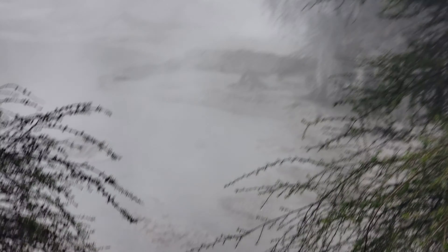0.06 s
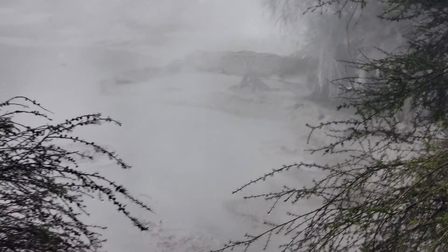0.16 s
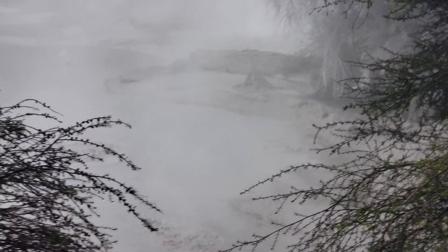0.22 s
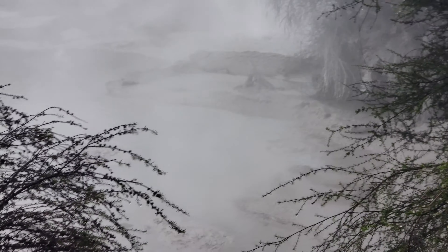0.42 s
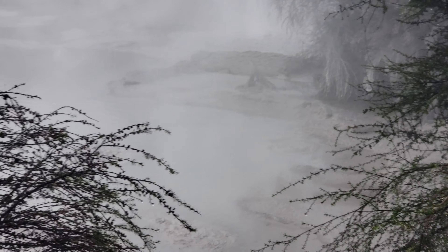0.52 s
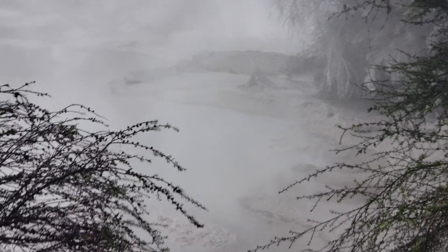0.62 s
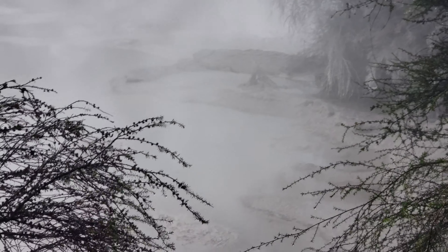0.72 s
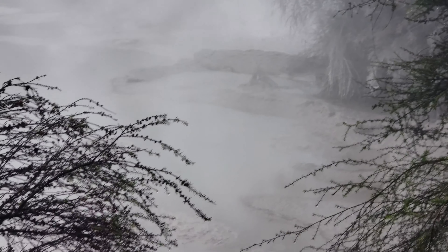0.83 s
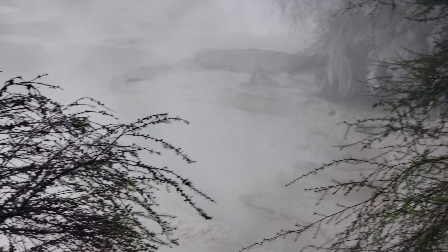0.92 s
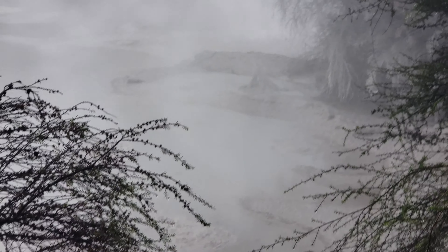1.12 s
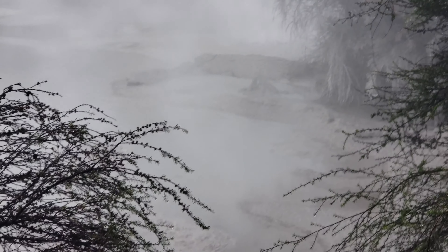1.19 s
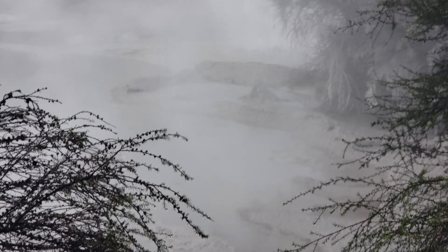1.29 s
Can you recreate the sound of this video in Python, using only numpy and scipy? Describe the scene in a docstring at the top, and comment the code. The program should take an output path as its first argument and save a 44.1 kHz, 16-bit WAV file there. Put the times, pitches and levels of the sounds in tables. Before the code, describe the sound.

Thick mud bubbles quietly in an outdoor hot pool, with irregular glugs and small wet pops over a low churn and faint steam hiss. Early on, a hand knocks once on the camera, then ticks and brushes lightly against it.

```python
"""A pool of hot mud simmers outdoors: gas pockets resonate in glugs, mostly rising in pitch, thin skins snap
open and spatter lands, and brief gusts of wind rumble low. Close by, a hand knocks once on a camera body,
exciting its damped modes, then ticks and brushes against it. Behind lie the soft hiss of steam, small ringing
bubbles, the low churn of distant boiling and dull echoes from the banks."""
import sys
import numpy as np
from scipy import signal
from scipy.io import wavfile

SR = 44100
rng = np.random.default_rng(int(sys.argv[2]) if len(sys.argv) > 2 else 0)


def unload_audio(sound):
    """Save the sound as a 16-bit wav file, at the path given as the first command line argument."""
    columns = np.transpose(np.atleast_2d(sound))
    # keep every value between -1 and 1, then stretch to whole-number steps
    steps = np.round(np.clip(columns, -1, 1) * 32767)
    wavfile.write(sys.argv[1], SR, steps.astype(np.int16))


N = 59535
TIME = np.arange(N) / SR
CUTOFF_HZ = 16200
POOL_PAN_DB, POOL_LAG_S, CASE_LAG_S = 4.5, 0.00029, 0.000342   # pan: left minus right; lag: right is later

# gas pockets, and low gusts of wind (the rows below 80 Hz): (time [s], length [s], start pitch [Hz], end pitch
# [Hz], level [dB], roughness [0-1])
GLUGS_AND_GUSTS = [(.004, 0.017, 480, 546, -52, 0.44), (.040, 0.022, 138, 170, -50.5, 0.5),
                   (0.099, 0.034, 206, 242, -60.5, 0.6), (0.121, 0.075, 99, 84, -50, 0),
                   (0.126, 0.032, 205, 250, -50.5, 0.48), (0.176, 0.017, 762, 660, -50, 0.5),
                   (.188, 0.038, 216, 292, -54.5, 0.8), (0.223, 0.015, 576, 710, -43.5, 0.6),
                   (0.297, 0.055, 277, 307, -51.5, 0.54), (0.425, 0.035, 87, 101, -54, 0.6),
                   (0.521, 0.024, 261, 370, -46.5, 0.6), (0.537, 0.033, 448, 640, -52.5, 0.4),
                   (0.611, 0.026, 192.5, 319, -41.5, 0.17), (.630, 0.023, 182, 170, -53, 0.1),
                   (.698, 0.079, 127.6, 152, -52.5, 0.3), (0.797, 0.0073, 241, 286, -38.5, 0),
                   (.803, 0.027, 212, 237, -52, 0.2), (.902, 0.059, 118, 193, -52, 0.7),
                   (.948, 0.034, 316, 440, -55.5, 0.65), (0.929, 0.093, 42, 53, -57, 0),
                   (1.071, 0.03, 211, 288, -47.5, 0.25), (1.072, 0.027, 96, 122, -51, 0.5),
                   (1.135, 0.045, 232, 345, -52, 0.66), (1.145, 0.018, 500, 610, -55, 0.7),
                   (1.078, 0.024, 666, 740, -56.5, 0.8), (1.165, 0.017, 226, 390, -41.5, 0.42),
                   (1.186, 0.0082, 675, 800, -45, 0.17), (1.1975, 0.0065, 357, 510, -42, 0.13),
                   (1.175, 0.058, 179, 220, -51, 0.25), (1.2, 0.036, 61.4, 69.6, -56, 0)]
def glugs(rise=0.24, fade_power=1.28, wobble_hz=83):
    """Cavity resonance: each gas pocket swells, rings and glides in pitch as it opens; the lowest rows are
    brief gusts of wind rumbling."""
    out = np.zeros(N)
    for start, length, from_hz, to_hz, db, rough in GLUGS_AND_GUSTS:
        age = np.clip((TIME - start) / length, 0, 1)
        swell = np.minimum(age / rise, np.maximum((1 - age) / (1 - rise), 0) ** fade_power)
        hz = from_hz * (to_hz / from_hz) ** age
        phase = 2 * np.pi * np.cumsum((age > 0) * hz) / SR
        wobble = np.sin(phase) * drift(wobble_hz) + np.cos(phase) * drift(wobble_hz)
        out += from_db(db) * swell * (np.sin(phase) + rough * wobble) / np.sqrt(1 + 2 * rough ** 2)
    return out


# landing mud: (time [s], level [dB], centre [Hz], t60 [s])
MUD_IMPACTS = [(.060, -51.5, 1660, 0.026), (.151, -43.5, 1270, 0.025), (.203, -44, 2500, 0.038),
               (0.212, -41.5, 2520, 0.014), (0.321, -46.5, 790, 0.04), (.356, -45.5, 1300, 0.019),
               (0.369, -46, 1400, 0.018), (0.537, -41.5, 3980, 0.0081), (0.565, -48, 1130, 0.015),
               (0.64, -50, 830, 0.013), (.660, -46.5, 3830, 0.017), (.669, -48, 1460, 0.02),
               (.703, -52, 1200, 0.04), (0.8021, -46.5, 1500, 0.0091), (.834, -45, 1630, 0.0099),
               (1.249, -53, 5000, 0.0065), (0.877, -47, 1050, 0.012), (.967, -56, 1580, 0.053),
               (1.113, -49.5, 1230, 0.019)]
def splats():
    """Impact noise: thrown mud lands in brief broadband bursts."""
    return sum(burst(*row, width=0.45) for row in MUD_IMPACTS)


# bursting skins: (time [s], level [dB], pitch [Hz], t60 [s])
SKIN_RUPTURES = [(.152, -45, 1290, 0.013), (0.369, -48, 1380, 0.0057), (.380, -51, 3300, 0.0047),
                 (.565, -43.5, 1130, 0.0069), (.669, -49, 950, 0.0077), (.836, -48, 1610, 0.0061),
                 (0.8573, -43, 1090, 0.0091), (.858, -51, 2530, 0.018), (0.859, -47.5, 3280, .006),
                 (1.035, -48.5, 1520, 0.005)]
def pops():
    """Impulse excitation: thin mud skins snap open with a short, clean ring."""
    return sum(ping(*row) for row in SKIN_RUPTURES)


# modes of the camera body: (frequency [Hz], relative level [dB], t60 [s], pan [dB])
CASE_MODES = [(361, -24, 0.074, 2), (558, -31, 0.066, 18), (658, -20, 0.03, 22), (977, -37, 0.0318, -6),
              (1310, -26, 0.021, 16), (1610, -7.5, 0.014, -4.5), (2080, -10.5, 0.01, 9),
              (2464, -19.5, 0.021, 1), (2710, -15, 0.011, -5), (3260, -20.5, 0.0068, -14.5),
              (4154, -13, 0.0096, -5.5), (4500, -14.5, 0.005, -4), (5760, -22.5, 0.0059, -8),
              (6520, -21.5, 0.0072, -8.5), (7240, -25.5, 0.0062, -16), (11210, -24.5, 0.0076, -1)]
def knock(start, gain_db=0.07, radiation_hz=2275, contact_hz=6870):
    """Modal vibration: a hard contact starts all modes at once and jolts the camera with a soft thud."""
    modes = sum(place(-ping(start, db + gain_db, hz, t60), pan_db, CASE_LAG_S)
                for hz, db, t60, pan_db in CASE_MODES)
    # the small case radiates little bass; the slightly soft contact limits the treble
    band = signal.butter(1, [radiation_hz, contact_hz], "band", fs=SR, output="sos")
    thud = place(ping(start, db=-44.5, hz=118, t60=0.13), pan_db=10, lag=CASE_LAG_S)
    return signal.sosfilt(band, modes) + thud


# spectrum of loose parts: (frequency [Hz], relative density [dB])
RATTLE_SPECTRUM = [(45, -6), (90, 3), (200, -5), (430, -3), (650, -2), (1200, 2.5), (1600, -3), (2900, 0.5),
                   (4700, -13), (8000, -22), (15500, -30)]
def rattle(start, tail_db=-34.5, shiver_db=-30.5):
    """Damped vibration: jolted loose parts give a quick shiver and a longer tail of noise."""
    def envelope(hz):
        tail_t60 = at_hz([(150, 0.37), (2000, 0.1), (11000, 0.24)], hz)   # (frequency [Hz], t60 [s])
        shiver = from_db(shiver_db) * dying(start, t60=0.031) * (hz > 250)
        return from_db(tail_db) * dying(start, tail_t60) + shiver
    return banded_noise(RATTLE_SPECTRUM, flicker_db=3, envelope=envelope)


# finger contacts: (time [s], level [dB], pitch [Hz], t60 [s], pan [dB])
FINGER_TICKS = [(0.4829, -40, 4330, 0.004, 9), (0.4821, -42, 13700, 0.0018, -16),
                (0.798, -53.5, 5450, 0.0035, 16), (0.802, -43, 4170, 0.0052, -13.5),
                (.880, -45, 3720, 0.003, 6), (0.879, -48.5, 11300, 0.00099, 9),
                (0.9025, -52, 5470, 0.0034, 13), (.903, -55, 12000, .001, 8)]
def ticks(grit_db=-5.5):
    """Impulse excitation: each light contact rings one mode of the case, with a trace of grit."""
    out = 0
    for start, db, hz, t60, pan_db in FINGER_TICKS:
        grit = burst(start, db + grit_db, hz, t60=0.0094, width=0.32)
        out += place(ping(start, db, hz, t60) + grit, pan_db, CASE_LAG_S)
    return out


# strokes of the hand: (time [s], half length [s], level [dB])
STROKES = [(0.148, 0.024, -58), (0.296, 0.07, -63), (0.489, 0.0089, -60), (0.707, 0.022, -67),
           (0.898, 0.018, -64.5)]
# spectrum of rubbing skin: (frequency [Hz], relative density [dB])
FRICTION_SPECTRUM = [(1500, 5), (4000, 0), (6500, -2), (9000, -1), (12000, -13), (15500, 3)]
def brushing():
    """Friction noise: skin slides over the case in soft strokes."""
    return sum(bell_curve(*row) for row in STROKES) * banded_noise(FRICTION_SPECTRUM, flicker_db=-3)


# spectrum of steam: (frequency [Hz], relative density [dB])
STEAM_SPECTRUM = [(290, -17), (500, -4), (1080, -10), (1420, -8.5), (1930, -14.5), (2690, -9.5),
                  (4400, -11.5), (5470, -11), (7700, -24), (8600, -37), (11100, -26), (13000, -24.5),
                  (16000, -43)]
# strength of steaming: (time [s], relative level [dB])
STEAM_FLOW = [(0, -60), (.15, -62.5), (.38, -61.5), (.5, -63.5), (.61, -66.5), (.68, -62), (.765, -70),
              (.88, -65), (1.01, -68.5), (1.1, -66), (1.2, -66.5), (1.35, -65)]
def steam(gain_db=3):
    """Amplitude-modulated noise: steam hisses softly, wavering in level and colour."""
    return from_db(gain_db + in_time(STEAM_FLOW)) * banded_noise(STEAM_SPECTRUM, flicker_db=3.5)


def small_bubbles(per_second=550, db=-66, t60_cycles=7.1, tilt_db_per_octave=-0.5):
    """Bubble resonance: little bubbles ring at random, more strongly when the pool steams harder."""
    pitches = np.geomspace(280, 3600, 18)
    strengths = from_db(3.4 * np.minimum(rng.exponential(1, N), 2)) * rng.choice([-1, 1], N)
    kicks = strengths * (rng.random(N) < per_second / SR)
    pitch_index = rng.integers(0, len(pitches), N)
    out = 0
    for k, hz in enumerate(pitches):
        width_hz = np.log(1000) / np.pi * hz / t60_cycles
        ring = resonate(kicks * (pitch_index == k), hz, width_hz) / hz
        lag = POOL_LAG_S * rng.uniform(-0.94, 2.06)
        out += place(ring * from_db(tilt_db_per_octave * np.log2(hz)), POOL_PAN_DB, lag)
    return from_db(db) * rms_one(out * from_db(in_time(STEAM_FLOW)))


# spectrum of the sizzle: (frequency [Hz], relative density [dB])
SIZZLE_SPECTRUM = [(4000, -12), (5300, 1), (6400, -1.5), (9000, -24), (12000, -10.5), (15500, -15)]
def sizzle():
    """Band-limited noise: a high sizzle swells and fades once."""
    return bell_curve(centre_s=1.098, half_s=0.049, db=-63.5) * banded_noise(SIZZLE_SPECTRUM, flicker_db=1)


def escaping_gas():
    """Narrow-band noise: escaping gas hisses around one pitch near the end."""
    level = in_time([(1.1, -94), (1.17, -62), (1.25, -74.5), (1.35, -68.5)])   # (time [s], level [dB])
    return from_db(level) * rms_one(resonate(rng.standard_normal((2, N)), hz=1360, width_hz=160))


# spectrum of distant boiling: (frequency [Hz], relative density [dB])
BOILING_SPECTRUM = [(22, -16), (45, -2.5), (90, 3), (160, 1), (300, -5.5), (500, -11.5), (900, -19.5),
                    (2000, -36)]
# strength of boiling: (time [s], level [dB])
BOILING_LEVEL = [(0, -62), (.15, -52.5), (.33, -57), (.47, -61.5), (.6, -60.5), (.75, -60.5), (.86, -59),
                 (.97, -60), (1.1, -59.5), (1.22, -61), (1.35, -61)]
def churn():
    """Low-frequency noise: distant boiling merges into an uneven rumble."""
    return from_db(in_time(BOILING_LEVEL)) * banded_noise(BOILING_SPECTRUM, flicker_db=1)


def bank_echoes(x, db=-12, t60=0.2, delay_s=0.0083):
    """Diffuse reflection: banks and bushes scatter back a dull, dying tail."""
    lowpass = signal.butter(1, 3000, fs=SR, output="sos")
    scatter = signal.sosfilt(lowpass, rng.standard_normal((2, N))) * dying(delay_s, t60)
    echoes = signal.fftconvolve(x[None], scatter, axes=1)[:, :N]
    return from_db(db) * echoes / np.sqrt(np.sum(dying(0, t60) ** 2))


# likeness of left and right: (frequency [Hz], correlation [0-1])
COHERENCE = [(28, 0.49), (60, 0.8), (130, 0.94), (290, 0.72), (640, 0.29), (1410, 0), (3100, 0.18),
             (6820, 0), (15000, 0.027)]
# stereo balance: (frequency [Hz], pan [dB])
NOISE_PAN = [(60, 3.5), (380, 6), (1290, 5), (2380, 2.5), (4400, -3.5), (8120, 5.5), (15000, -1)]
def banded_noise(spectrum, flicker_db, envelope=lambda hz: 1):
    """Partial coherence: each flickering band mixes noise in phase and in antiphase on the two sides."""
    low, high = spectrum[0][0], min(spectrum[-1][0], CUTOFF_HZ)
    edges = np.geomspace(low, high, int(2.5 * np.log2(high / low)) + 1)
    white = rng.standard_normal((2, 2, N + SR // 4))
    sides = np.array([[1], [-1]])
    out, power = 0, 0
    for k, band in enumerate(zip(edges, edges[1:])):
        bandpass = signal.butter(2, band, "band", fs=SR, output="sos")
        mid, side = signal.sosfilt(bandpass, white[k % 2])[:, -N:]
        hz = np.sqrt(band[0] * band[1])
        alike = at_hz(COHERENCE, hz)
        gain = from_db(at_hz(spectrum, hz) + flicker_db * drift(14) + sides * at_hz(NOISE_PAN, hz) / 2)
        part = gain * (np.sqrt(1 + alike) * mid + np.sqrt(1 - alike) * side * sides)
        out += part * envelope(hz)
        power += np.mean(part ** 2)
    return out / np.sqrt(power)


def burst(start, db, hz, t60, width):
    """Forced resonance: a dying spray of tiny impacts drives one broad mode; width is 1 / Q."""
    fade = dying(start, t60)
    grains = resonate(rng.standard_normal(N) * fade, hz, width * hz)
    grains = signal.sosfilt(signal.butter(2, min(2 * hz, CUTOFF_HZ), fs=SR, output="sos"), grains)
    return from_db(db) / 2 * rms_one(grains) * np.sqrt(np.mean(fade ** 2))


def ping(start, db, hz, t60):
    """Free vibration of one damped mode."""
    return from_db(db) * np.sin(2 * np.pi * hz * (TIME - start)) * dying(start, t60)


def resonate(x, hz, width_hz):
    """Two-pole resonance with unit peak gain."""
    r = np.exp(-np.pi * width_hz / SR)
    feedback = [1, -2 * r * np.cos(2 * np.pi * hz / SR), r * r]
    return signal.lfilter(np.array([1, 0, -1]) * (1 - r * r) / 2, feedback, x + 1e-18)


def place(x, pan_db, lag):
    """Localisation by level and time difference between left and right."""
    return np.array([x * from_db(pan_db / 2), np.interp(TIME - lag, TIME, x) * from_db(-pan_db / 2)])


def dying(start, t60):
    """Exponential decay from a sudden onset, 60 dB in t60 seconds."""
    return (TIME >= start) * np.exp(-np.log(1000) * np.maximum(TIME - start, 0) / t60)


def bell_curve(centre_s, half_s, db):
    """Gaussian swell and fade."""
    return from_db(db) * np.exp(-((TIME - centre_s) / half_s) ** 2)


def drift(hz, step=40):
    """Random modulation: low-passed noise of unit power."""
    r = np.exp(-2 * np.pi * hz * step / SR)
    slow = signal.lfilter([1], [1, -2 * r, r * r], rng.standard_normal(N // step + 2002))[2000:]
    return np.interp(np.arange(N) / step, np.arange(len(slow)), rms_one(slow))


def in_time(rows):
    """Linear interpolation at every sample."""
    return np.interp(TIME, *np.transpose(rows))


def at_hz(rows, hz):
    """Interpolation over log frequency."""
    frequencies, values = np.transpose(rows)
    return np.interp(np.log(hz), np.log(frequencies), values)


def from_db(db):
    """Decibels to amplitude."""
    return 10 ** (np.asarray(db) / 20)


def rms_one(x):
    """Normalisation to unit power."""
    return x / np.sqrt(np.mean(x ** 2) + 1e-20)


def scene(knock_s=0.24659):
    """Superposition: the pool to the left, the hand close by, steam all round."""
    gas, spatter = glugs(), splats() + pops()
    pool = place(gas, POOL_PAN_DB, POOL_LAG_S) + place(spatter, pan_db=7.5, lag=0.0001)
    background = bank_echoes(gas + spatter) + steam() + churn() + escaping_gas() + small_bubbles() + sizzle()
    hand = knock(knock_s) + rattle(knock_s) + ticks() + brushing()
    return pool + hand + background


def record(dry):
    """Band limiting: the sound is held within full scale, then steeply low-passed."""
    lowpass = signal.ellip(10, 0.2, 70, CUTOFF_HZ, fs=SR, output="sos")
    return signal.sosfilt(lowpass, np.clip(dry, -1, 1))


dry = scene()
out = record(dry)
unload_audio(out)
```